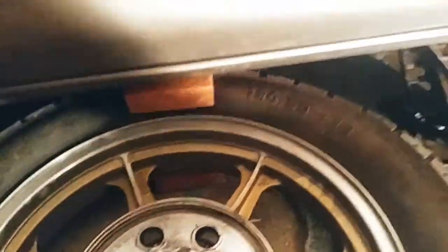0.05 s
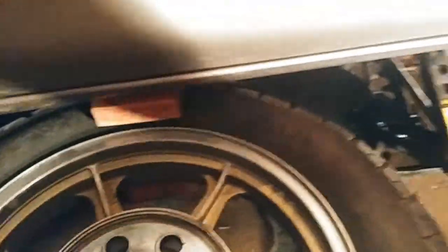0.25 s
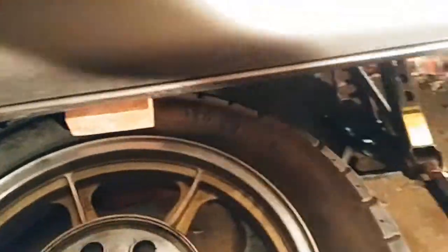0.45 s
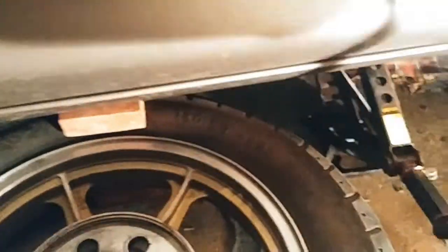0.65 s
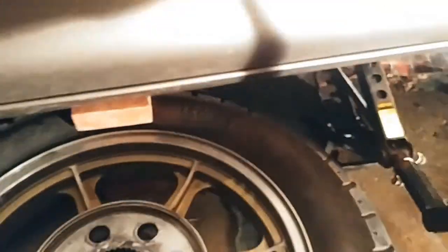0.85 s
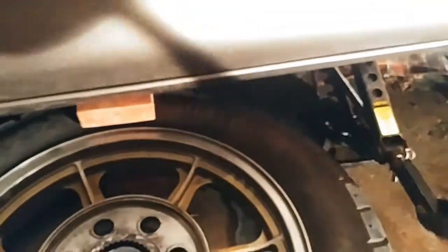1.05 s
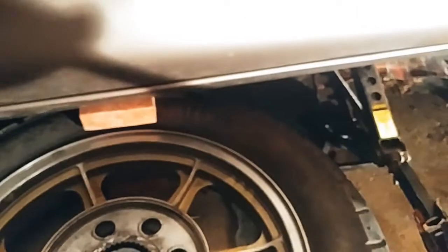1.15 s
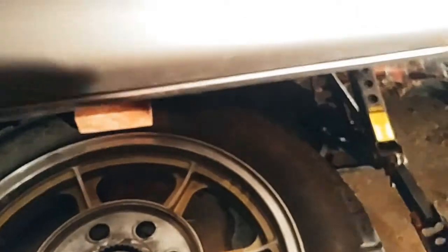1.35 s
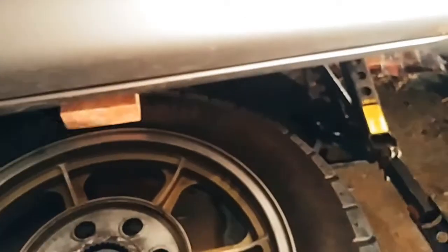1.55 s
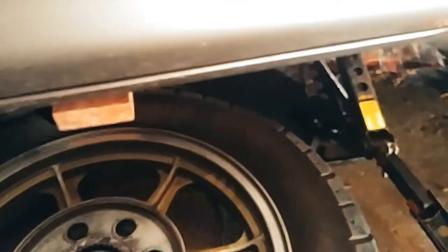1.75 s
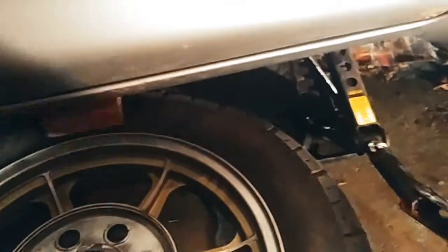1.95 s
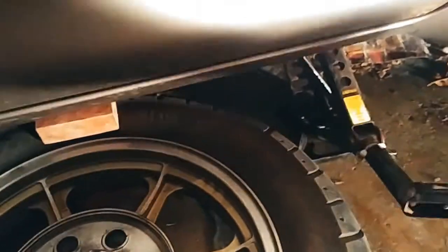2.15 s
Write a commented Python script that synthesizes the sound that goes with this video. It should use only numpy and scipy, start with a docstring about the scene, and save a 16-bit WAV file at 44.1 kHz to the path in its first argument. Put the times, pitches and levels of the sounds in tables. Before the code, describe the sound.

Close and slightly left in a small garage, a car jack's loose crank drops with a sharp ringing clank. It scrapes softly, knocks and pings, then clanks again more quietly as the screw grinds, with a low rumble underneath.

```python
"""Lowering a car on a scissor jack

In a small garage, the jack close by on the left, the crank's loose joint drops over twice with a steel
clank that booms through the car body. Between the clanks the crank rubs and pings, the shifting load
knocks, and the screw grinds and hisses as it turns, all over a low, uneven rumble."""
import sys
import numpy as np
from scipy import signal
from scipy.fft import rfft, irfft, next_fast_len
from scipy.io import wavfile

SR = 44100
rng = np.random.default_rng(int(sys.argv[2]) if len(sys.argv) > 2 else 0)


def master(y):
    """Save y as 16-bit WAV."""
    cut = np.clip(np.atleast_2d(y).T, -1, 1)
    pcm = np.round(cut * 32767)  # scale
    wavfile.write(sys.argv[1], SR, pcm.astype(np.int16))


N = 97020
TIME = np.arange(N) / SR

# the joint drops over: t/s, level/dB, dull above/Hz, chatter/s, room send/dB, boom/dB, boom delay/s
CLANKS = [(0.2289, -11, 8104, .009, -3.5, -23, .088), (1.8553, -19.5, 5370, 0.0064, -4, -30, 0.082)]
# spectrum of the steel's dense ringing: f/Hz, level/dB
STEEL = [(60, -20.5), (130, -8), (290, -8), (450, -14.5), (950, -4), (1250, -6), (1700, 0), (2100, -4.5),
         (2500, -3.5), (2900, 0.5), (3800, -2.5), (4500, -5.5), (4950, -9.5), (5600, -4), (6400, -3.5),
         (7200, -8.5), (8500, -13)]
# the jack's modes: f/Hz
JACK_HZ = [293, 605, 651, 770, 900, 964, 1140, 1374, 1640, 1720, 2300, 2660, 2915, 3349, 3730, 3898, 5775,
           6335]
# for each jack mode: t60/s, level in the first clank/dB, level in the second/dB
JACK_MODES = [(.4, -22, -18.5), (0.31, -21, -53), (.8, -32, -49), (0.97, -33, -47.5), (.3, -18, -22.5),
              (.34, -23.5, -21), (.12, -10.5, -12.5), (0.42, -16, -41), (.07, -1.5, 4), (.2, -14, -12),
              (.1, -21.5, -6.5), (.28, -27, -11), (0.39, -21, -17), (.2, -14, -36), (.25, -20.5, -21),
              (.2, -14.5, -32), (.25, -22.5, -38), (.16, -17.5, -20.5)]
# rubbing strokes: peak t/s, rise/s, fall/s, level/dB, centre f/Hz, width/octaves, grit/dB
RUBS = [(.006, 0.0034, 0.0082, -41, 3530, 0.2, -7), (0.062, 0.042, .028, -52.5, 3080, 1, -3.5),
        (.472, 0.013, 0.013, -51, 3380, 0.27, -9), (0.584, 0.0093, 0.026, -56, 4000, 0.22, -8),
        (0.793, 0.026, 0.031, -51.5, 4500, 0.28, -4.5), (1.268, 0.018, 0.032, -61.5, 4000, 1, 1.5),
        (1.41, 0.014, 0.016, -60.5, 4330, 0.38, -4), (1.489, 0.0048, 0.045, -61, 6800, 0.32, 2),
        (1.53, 0.024, 0.011, -48.5, 2950, 0.95, -13), (1.658, 0.0071, 0.026, -45.5, 3240, 1, -12.5)]
# the crank's modes: f/Hz
CRANK_HZ = [2365, 2875, 2995, 3780, 3865, 4150, 4745, 5090, 5440, 6250, 7690]
# for each crank mode: width/Hz, level/dB
CRANK_MODES = [(60, -4), (35, -2), (25, -1.5), (34.4, -6.5), (50.1, -16.5), (55, -16.5), (35, -4.5),
               (90, -14.5), (69.7, -12.5), (200, -12), (80, -11)]
# spectrum of the grit in a rub: f/Hz, level/dB
GRIT = [(500, -2), (1500, 1.5), (2600, -10.5), (3900, 2), (5500, 1.5), (6800, -6), (8000, 0.5),
        (10000, -18), (14000, -12)]
# the crank slips free: t/s, level/dB, centre f/Hz, width/octaves
PINGS = [(.003, -30, 3414, 0.26), (1.529, -35, 3700, 0.12), (1.536, -35.5, 4700, .1),
         (1.65, -33, 3130, 0.25), (1.656, -27.5, 4750, 0.067)]
# the load shifts: t/s, level/dB
KNOCKS = [(1.504, -30.5), (1.517, -37.5), (1.53, -37)]
# spectrum of a knock's thud: f/Hz, level/dB
THUD = [(45, -7.5), (80, 12), (140, 1.5), (200, -1), (310, -5.5), (430, -12.5), (600, -16), (1000, -18),
        (2500, -16.5), (6000, -33), (10000, -42)]
# the car body's modes: f/Hz, t60/s, level/dB
BODY_MODES = [(115, 0.11, -6.5), (200, 0.13, -11), (302.6, 0.075, -10), (417, .1, -13.5)]
# light contacts: t/s, level/dB, f/Hz
TICKS = [(.631, -33.5, 1230), (1.8386, -33, 2760), (2.098, -43, 1360)]
# fader moves on the screw's friction: t/s, grinding gain/dB, hiss gain/dB
SCREW_FADERS = [(0, -32.5, -34.5), (1.201, -32.5, -29.5), (1.45, -10, -10), (1.63, -10.5, -12.5),
                (1.69, -1, -5.5), (1.73, -2, 5), (1.8, -3, -8), (1.898, 10, 3), (2.02, 4, 0.5),
                (2.109, 0.5, -1.5), (2.16, -13.5, -18), (2.2, -10.5, -11)]
# spectrum of the grinding thread: f/Hz, level/dB
GRIND = [(120, 2), (300, -6.5), (450, -5), (900, -15.5), (1400, -7), (3000, -10.5), (4700, -29.5),
         (7000, -30.5), (9000, -39.5)]
# the rumble's swells and dips: t/s, level/dB
RUMBLE_LEVEL = [(0, -41), (.15, -47), (.21, -51.5), (.3, -35), (.44, -41.5), (.54, -50), (.64, -45),
                (.7, -49), (.81, -48.5), (.95, -46), (1.04, -57), (1.15, -57.5), (1.25, -47.5),
                (1.35, -66.5), (1.43, -51), (1.75, -49.5), (2.1, -48.5), (2.2, -58.5)]
# spectrum of the rumble: f/Hz, level/dB
RUMBLE = [(25, -34), (38, -15.5), (52, -2.5), (80, 0), (120, -3), (170, -12.5), (250, -22.5), (500, -29.5),
          (1000, -60.5)]
# spectrum of the background hiss: f/Hz, level/dB
AIR = [(100, 0.5), (300, -2.5), (600, -9), (1200, -13), (3000, -17), (6500, -23), (9000, -27.5),
       (14000, -26), (16000, -33.5)]
# the garage's decay: f/Hz, t60/s
ROOM_T60 = [(100, 0.39), (700, 0.51), (1500, 0.43), (3000, 0.48), (6200, 0.5), (8000, 0.32), (14000, 0.19)]
# tone of the reverb: f/Hz, level/dB
ROOM_COLOUR = [(100, 2.5), (500, 5.5), (950, 5), (1600, -1), (3000, -4), (4600, -8), (6200, -6),
               (8500, -9.5)]
# left-right likeness of diffuse sound: f/Hz, likeness/0-1
LIKENESS = [(100, .97), (280, 0.59), (600, 0.23), (1500, .2), (12000, 0.033)]
# EQ on the right side of the direct sound: f/Hz, level/dB
DIRECT_RIGHT = [(100, -4.5), (500, -5.5), (1000, -3.5), (1600, -7.5), (2400, -0.5), (3500, -15.5),
                (4700, -14), (6200, -13), (8500, -4.5)]
# EQ on the right side of the reverb: f/Hz, level/dB
ROOM_RIGHT = [(100, -10), (500, -2.5), (1000, -10.5), (3000, -10), (6200, -14), (8500, 2)]

CHATTER_RISE_S, CHATTER_T60_S, CRASH_DB = .0027, .05, -2.5
RING_MAX_DELAY_S, RING_DB, RING_SEND_DB = .005, 2.5, -22.5
BOOM_HZ, BOOM_RISE_S, BOOM_T60_S = 110, .047, .12
PING_RISE_S, KNOCK_RISE_S = .0067, .0029
GRIND_DB, GROAN_DB, HISS_DB, HISS_HZ, HISS_WIDTH_HZ = -53, -55, -61, 6050, 930
SQUEAL_PEAK_S, SQUEAL_FADE_S, SQUEAL_DB = 1.38, .12, -72
ROOM_BUILD_S, LEFT_LAG_S = .008, .0003


def clanks():
    """The joint chatters and sets the jack ringing. Returns the direct sound and a one-blow room send."""
    direct, send = 0, 0
    for k, (s, db, dull_hz, chatter_s, room_db, _, _) in enumerate(CLANKS):
        release = np.where(TIME < s + chatter_s, 1, dying(s + chatter_s, CHATTER_T60_S))
        envelope = attack(s, CHATTER_RISE_S) ** .5 * release
        crash = rms_one(low_pass(noise(STEEL), dull_hz, order=3)) * envelope * from_db(CRASH_DB)
        impulse = signal.unit_impulse(N, int((s + chatter_s / 2) * SR))
        blow = rms_one(low_pass(colour(impulse, STEEL), dull_hz, order=3)) * np.std(crash)
        modes = sum(from_db(mode_db[k]) * ring(s + RING_MAX_DELAY_S * rng.uniform(.45, 1), hz, t60)
                    for hz, (t60, *mode_db) in zip(JACK_HZ, JACK_MODES))
        direct += from_db(db) * (crash + from_db(RING_DB) * modes)
        send += from_db(db + room_db) * (blow + from_db(RING_SEND_DB) * modes)
    return low_pass(np.array([direct, send]), hz=8700, order=30)


def booms():
    """The car body's low note blooms after each clank and dies away."""
    out = 0
    for s, *_, db, delay_s in CLANKS:
        swell = np.exp(np.minimum(TIME - s - delay_s, 0) / BOOM_RISE_S) * (TIME > s)
        envelope = np.where(TIME < s + delay_s, swell, dying(s + delay_s, BOOM_T60_S))
        out += from_db(db) * envelope * np.sin(2 * np.pi * BOOM_HZ * (TIME - s))
    return out


def rubs():
    """The crank rubs in its eye: tiny slips excite its modes, each stroke in its own register."""
    modes = np.array([resonant_noise(hz, width) for hz, (width, _) in zip(CRANK_HZ, CRANK_MODES)])
    grit = rfft(noise(GRIT))
    hz = np.fft.rfftfreq(N, 1 / SR) + 1
    out = 0
    for s, rise_s, fall_s, db, centre_hz, octaves, grit_db in RUBS:
        from_peak = (TIME - s) / np.where(TIME < s, rise_s, fall_s)
        swell = 1 / np.cosh(np.clip(from_peak * np.sqrt(2), -20, 20))
        gains = crank_gains(centre_hz, octaves)
        rms_in_stroke = np.sqrt(np.average(modes ** 2, axis=1, weights=swell ** 2))
        tones = (gains / np.linalg.norm(gains) / rms_in_stroke) @ modes
        rasp = rms_one(irfft(grit * bell(hz, centre_hz, octaves=.68), N))
        out += from_db(db) * swell * (tones + from_db(grit_db) * rasp)
    # a faint ring of the jack dies away at the start
    return out + from_db(-56) * ring(RUBS[0][0], hz=770, t60=.3)


def pings():
    """The crank's modes ring cleanly as it slips free."""
    out = 0
    for s, db, centre_hz, octaves in PINGS:
        for hz, gain in zip(CRANK_HZ, crank_gains(centre_hz, octaves)):
            out += from_db(db) * gain * ring(s, hz, t60=.069) * attack(s, PING_RISE_S)
    return out


def knocks():
    """The load shifts: a quick run of dull knocks rings the car body and leaves it shuddering."""
    envelope = sum(from_db(db) * dying(s, t60=.079) * attack(s, KNOCK_RISE_S) for s, db in KNOCKS)
    thuds = from_db(-2) * noise(THUD) * envelope
    body = sum(from_db(db + mode_db) * ring(s, hz, t60)
               for s, db in KNOCKS for hz, t60, mode_db in BODY_MODES)
    shudder = from_db(-37) * ring(KNOCKS[1][0], hz=75.6, t60=.48)
    return thuds + body + shudder


def ticks():
    """Small, heavily damped contacts give dry ticks."""
    out = 0
    for s, db, hz in TICKS:
        width_hz = .95 * hz
        burst = rms_one(resonant_noise(hz, width_hz)) * dying(s, t60=.017)
        out += from_db(db) * low_pass(resonate(burst, hz, width_hz), 1.6 * hz, order=3)
    return out


def screw():
    """The loaded thread grinds, hisses and groans as it turns."""
    faders = np.array(SCREW_FADERS)
    hiss = rms_one(resonate(resonant_noise(HISS_HZ, HISS_WIDTH_HZ), HISS_HZ, HISS_WIDTH_HZ))
    groan = rms_one(resonant_noise(hz=302.8, width_hz=18))
    grinding = from_db(GRIND_DB) * noise(GRIND) + from_db(GROAN_DB) * groan
    return fader(faders[:, [0, 1]]) * grinding + fader(faders[:, [0, 2]]) * from_db(HISS_DB) * hiss


def squeal():
    """The thread gives one thin, very high squeal as it takes up the turn."""
    swell = np.exp(-((TIME - SQUEAL_PEAK_S) / SQUEAL_FADE_S) ** 2)
    return from_db(SQUEAL_DB) * swell * rms_one(resonant_noise(hz=14350, width_hz=240))


def garage(send):
    """Diffuse reverb that builds quickly and dies band by band."""
    spectrum, hz = rfft(diffuse()), np.fft.rfftfreq(N, 1 / SR)
    centres, t60s = np.transpose(ROOM_T60)
    bands = [irfft(spectrum * at_hz(np.c_[centres, share], hz), N) for share in np.eye(len(t60s))]
    tail = sum(band * dying(0, t60) for band, t60 in zip(bands, t60s))
    tail = rms_one(tail * (1 - np.exp(-TIME / ROOM_BUILD_S))) / np.sqrt(N)
    left, right = signal.fftconvolve(colour(send, ROOM_COLOUR)[None], tail, axes=1)[:, :N]
    return np.array([left, colour(right, ROOM_RIGHT)])


def background():
    """A bed of uneven low rumble and faint steady hiss, both leaning left."""
    rumble = fader(RUMBLE_LEVEL) * rms_one(colour(diffuse(), RUMBLE)) * from_db([[0], [-4.5]])
    air = rms_one(colour(diffuse(), AIR)) * from_db([[-65.5], [-67.5]])
    return rumble + air


def crank_gains(centre_hz, octaves):
    """Gain of each crank mode, favouring those near the centre."""
    distance = np.log2(np.array(CRANK_HZ) / centre_hz) / octaves
    return from_db([db for _, db in CRANK_MODES]) * np.exp(-.5 * distance ** 2)


def bell(hz, centre_hz, octaves):
    """Gain of a broad bell around a centre frequency."""
    return 1 / (1 + (np.log2(hz / centre_hz) / octaves) ** 2)


def from_db(db):
    """Decibels to gain."""
    return 10 ** (np.asarray(db) / 20)


def rms_one(x):
    """Scale to unit power."""
    return x / np.sqrt(np.mean(x ** 2) + 1e-20)


def at_hz(points, hz):
    """Read a table along log frequency."""
    freqs, values = np.transpose(points)
    return np.interp(np.log(np.maximum(hz, 1)), np.log(freqs), values)


def fader(points):
    """Gain over time from points of t/s, level/dB."""
    return from_db(np.interp(TIME, *np.transpose(points)))


def colour(x, points):
    """Minimum-phase EQ through points of f/Hz, level/dB."""
    size = 2 * next_fast_len(N)
    gains = from_db(at_hz(points, np.fft.rfftfreq(size, 1 / SR)))
    cepstrum = irfft(np.log(gains), size)
    cepstrum[1:size // 2] *= 2
    cepstrum[size // 2 + 1:] = 0
    return irfft(rfft(x, size) * np.exp(rfft(cepstrum)), size)[..., :N]


def noise(points):
    """Coloured noise of unit power."""
    return rms_one(colour(rng.standard_normal(N), points))


def diffuse():
    """Stereo white noise, alike in the bass and wide in the treble."""
    mid, side = rfft(rng.standard_normal((2, N)))
    alike = np.clip(at_hz(LIKENESS, np.fft.rfftfreq(N, 1 / SR)), 0, 1)
    return rms_one(irfft(np.sqrt(1 + alike) * mid + np.sqrt(1 - alike) * side * [[1], [-1]], N))


def low_pass(x, hz, order):
    """Butterworth low-pass."""
    return signal.sosfilt(signal.butter(order, hz, fs=SR, output="sos"), x + 1e-18)


def resonate(x, hz, width_hz):
    """One resonance, unity gain at its peak."""
    r = np.exp(-np.pi * width_hz / SR)
    feedback = [1, -2 * r * np.cos(2 * np.pi * hz / SR), r * r]
    return signal.lfilter(np.array([1, 0, -1]) * (1 - r * r) / 2, feedback, x + 1e-18)


def resonant_noise(hz, width_hz):
    """White noise through one resonance."""
    return resonate(rng.standard_normal(N), hz, width_hz)


def attack(s, rise_s):
    """Linear fade-in from time s."""
    return np.clip((TIME - s) / rise_s, 0, 1)


def dying(s, t60):
    """Envelope that starts at time s and dies away."""
    return (TIME >= s) * np.exp(-np.log(1000) * np.maximum(TIME - s, 0) / t60)


def ring(s, hz, t60):
    """A mode struck at time s."""
    return dying(s, t60) * np.sin(2 * np.pi * hz * (TIME - s))


def scene():
    """The jack sits mostly on the left, and the garage answers."""
    clank, clank_send = clanks()
    boom = booms()
    crank = rubs() + pings()
    details = knocks() + ticks() + screw() + squeal()
    left = np.interp(TIME - LEFT_LAG_S, TIME, clank + boom + crank + details)
    right = colour(from_db(-3.5) * clank + boom + from_db(-1.5) * (crank + details), DIRECT_RIGHT)
    room_send = clank_send + from_db(-17) * crank + from_db(-10.5) * details
    return np.array([left, right]) + garage(room_send) + background()


def record(dry):
    """Cut the sub-bass and the very top."""
    low_cut = signal.butter(6, 42, "high", fs=SR, output="sos")
    high_cut = signal.ellip(10, .1, 70, 15800, fs=SR, output="sos")
    return signal.sosfilt(high_cut, signal.sosfilt(low_cut, dry))


dry = scene()
out = record(dry)
master(out)
```